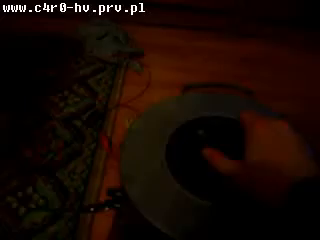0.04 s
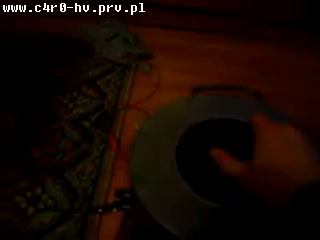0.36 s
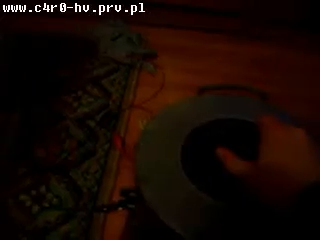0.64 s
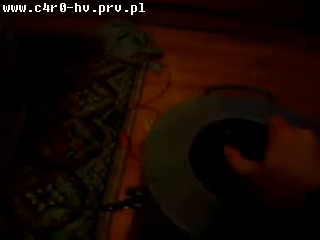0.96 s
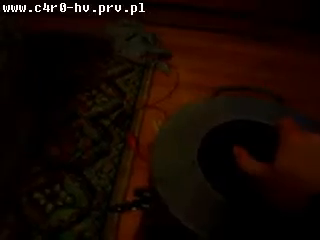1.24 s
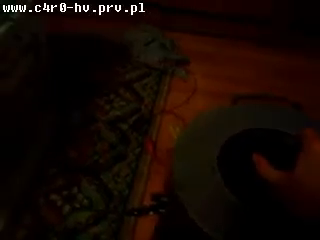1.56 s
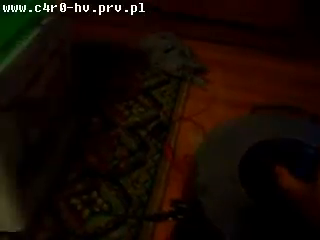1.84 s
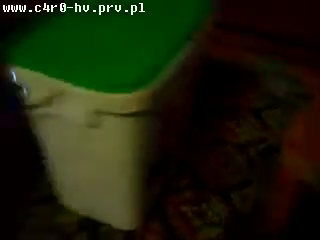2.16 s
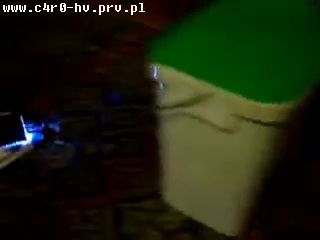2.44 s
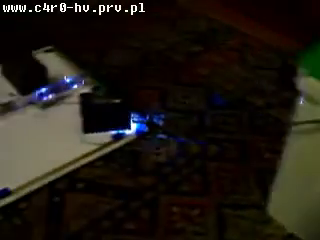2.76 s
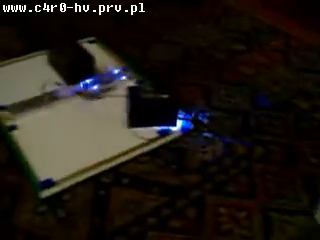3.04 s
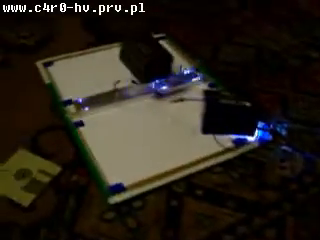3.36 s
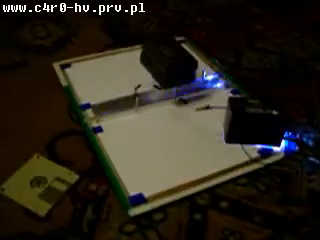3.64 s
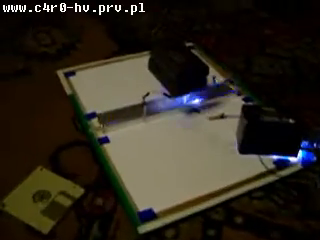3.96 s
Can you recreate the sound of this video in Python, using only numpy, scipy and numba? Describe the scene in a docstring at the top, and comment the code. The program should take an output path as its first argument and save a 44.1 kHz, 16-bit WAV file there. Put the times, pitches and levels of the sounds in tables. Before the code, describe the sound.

Rapid high-voltage sparks make a loud, harsh buzz in a quiet room. At first there is only faint hiss. A short, sharp burst of sparks comes near 0.9 seconds, then a brief gap. From about 1.2 seconds the sparking sputters, overloading the microphone, and settles by 1.5 seconds into a steady buzz with light fizz and hum. It continues until 4 seconds, shifting in tone as the microphone approaches.

```python
"""A living room: a homemade high-voltage rig on the floor misfires, sputters, then sparks with the mains.
In each 50 Hz cycle dielectric breakdown of the air gives a main crack, bright restrikes and weak sparks
of reverse polarity. They excite the rig's modes and the room, over corona fizz, core hum and hiss.
A hand-held microphone nears the gaps, so the colour shifts; it overloads until its gain control settles."""
import sys
import numpy as np
from scipy import signal
from scipy.fft import rfft, irfft
from scipy.io import wavfile
from scipy.ndimage import uniform_filter1d
from numba import njit

SR = 44100
rng = np.random.default_rng(int(sys.argv[2]) if len(sys.argv) > 2 else 0)


def dump_mix(stems):
    """Bounce the given channels to the path in sys.argv[1] as a 16-bit WAV at rate SR."""
    frames = np.atleast_2d(stems).T  # one column per channel
    limited = np.clip(frames, -1, 1)  # hard clip at full scale
    pcm = np.round(limited * 32767).astype(np.int16)
    wavfile.write(sys.argv[1], SR, pcm)


N = 176400
MAINS_HZ = 50
TIME, CYCLE_STARTS = np.arange(N) / SR, np.arange(0, N / SR, 1 / MAINS_HZ)


def undb(db):
    return 10 ** (np.asarray(db) / 20)

def unit(x):
    return x / np.sqrt(np.mean(x ** 2))

def curve(table, column=1):
    """Linear interpolation of one column in time."""
    rows = np.array(table, float)
    return np.interp(TIME, rows[:, 0], rows[:, column])

def convolve(x, response):
    return signal.oaconvolve(x, response)[:N]

def colour(x, points, size=1024):
    """Minimum-phase filter through (f/Hz, gain/dB) points."""
    hz, db = np.array(points, float).T
    bins = np.maximum(np.fft.rfftfreq(size, 1 / SR), 1)
    cepstrum = irfft(np.log(undb(np.interp(np.log(bins), np.log(hz), db))))
    cepstrum[1:size // 2] *= 2
    cepstrum[size // 2 + 1:] = 0
    return convolve(x, irfft(np.exp(rfft(cepstrum))))

def butter(x, hz, kind, order=2):
    return signal.sosfilt(signal.butter(order, hz, kind, fs=SR, output="sos"), x)

def steep_lowpass(x, hz):
    return signal.sosfilt(signal.ellip(10, .2, 70, hz, fs=SR, output="sos"), x)

@njit
def resonator(x, hz, width_hz):
    y, band, low = np.empty(len(x)), 0., 0.
    for i in range(len(x)):
        g, damping = np.tan(np.pi * hz[i] / SR), width_hz / hz[i]
        v = (band + g * (x[i] - low)) / (1 + g * (g + damping))
        band, low = 2 * v - band, low + 2 * g * v
        y[i] = damping * v
    return y

def resonance(x, hz, width_hz):
    """Second-order resonance of peak gain 1; the centre is steady or moving."""
    return resonator(x, hz * np.ones(N), float(width_hz))

def bandwidth(t60_s):
    return np.log(1000) / np.pi / t60_s

def sines(partials):
    return sum(undb(db) * np.sin(2 * np.pi * hz * TIME) for hz, db in partials)

def clicks(times, sizes, taps=8):
    """Band-limited impulses placed between samples."""
    out, at = np.zeros(N), np.asarray(times)[:, None] * SR
    index = at.astype(int) + np.arange(1 - taps, taps + 1)
    pulse = np.sinc(index - at) * np.sinc((index - at) / taps) * (index < N)
    np.add.at(out, np.clip(index, 0, N - 1), pulse * sizes[:, None])
    return out

def reflections(x, decay_s, onset_s, size, places):
    """Diffuse field: decaying echo patterns, crossfaded along the microphone's path."""
    age, place, out = np.arange(size) / SR, np.linspace(0, places - 1, N), 0
    envelope = np.exp(-age / decay_s) * (1 - np.exp(-(age / onset_s) ** 2))
    for k, noise in enumerate(rng.standard_normal((places, size))):
        echoes = noise * envelope
        share = np.cos(np.pi / 2 * np.minimum(abs(place - k), 1))
        out = out + convolve(x * share, echoes / np.linalg.norm(echoes))
    return out


# spectrum of the room's hiss: f/Hz, relative level/dB
HISS = [(18, -37), (30, -29), (62, -14), (140, -15.5), (195, -11.5), (420, -15), (498, -14.5), (752, -16),
        (1220, -19.5), (5480, -28.5), (7330, -28.5), (9800, -31.5), (12700, -79), (21600, -120)]
# faint hum: f/Hz, bandwidth/Hz, level/dB
HUM_BANDS = [(537, 12, -64)]
# steady tone and thin whine: f/Hz, level/dB
STEADY_TONES = [(500, -58), (7450, -67.5)]

def background():
    """Ambient noise: broadband hiss, narrowband hum and pure tones superpose."""
    hum = sum(undb(db) * unit(resonance(rng.standard_normal(N), hz, width)) for hz, width, db in HUM_BANDS)
    hiss = undb(-54) * unit(colour(rng.standard_normal(N), HISS))
    return hiss + hum + sines(STEADY_TONES)

# spells of sparking: start t/s, end t/s
SPELLS = [(.941, 1.02), (1.163, 4.1)]

def sparking(t):
    return sum(1. * ((t > on) & (t < off)) for on, off in SPELLS)

def powered():
    """Smoothed gate: 1 while sparking, else 0."""
    return uniform_filter1d(sparking(TIME), size=100)

# core hum: t/s, level/dB
CORE_LEVEL = [(1.2, -34.5), (1.48, -32), (1.56, -31), (1.78, -26), (1.9, -42), (2.2, -37), (2.7, -33),
              (3.0, -33), (4.0, -59)]
# its partials: f/Hz, relative level/dB
CORE_PARTIALS = [(100, 0), (200, -6)]

def transformer():
    """Forced vibration: the core hums at even mains harmonics while the gaps draw current."""
    return powered() * undb(curve(CORE_LEVEL)) * sines(CORE_PARTIALS)

# corona bursts in a cycle: centre t/ms, half length/ms, level/dB
CORONA_BURSTS = [(4.3, 3.05, -1), (16.5, 4.9, -7.5)]
# their spectrum: f/Hz, relative level/dB
FIZZ = [(1500, -39), (4000, -10), (6500, -5), (7700, 3.5), (9000, -25), (10000, -5.5)]

def corona(scatter_db=1.5):
    """Corona discharge: the wires fizz around each voltage peak, a little differently every cycle."""
    gate = 0
    for centre_ms, half_ms, db in CORONA_BURSTS:
        turns = (TIME - centre_ms / 1000) * MAINS_HZ + 1.5
        away_ms = (turns % 1 - .5) * 1000 / MAINS_HZ
        strength = undb(db + scatter_db * rng.standard_normal(N // 100))[turns.astype(int)]
        gate = gate + strength * np.exp(-(away_ms / half_ms) ** 4)
    return powered() * gate * unit(colour(rng.standard_normal(N), FIZZ))

# room response: f/Hz, gain/dB
ROOM_COLOUR = [(60, -25), (250, -4), (500, 5), (800, 9), (1050, 11), (1450, 7), (2300, 12), (3700, 12),
               (5000, 14.5), (6500, 10.5), (7200, 3.5), (7900, 18.5), (8800, 18), (9800, 7)]

def room(x, t60_s=.29):
    """Reverberation: wall reflections build up, then decay exponentially."""
    return reflections(colour(x, ROOM_COLOUR), t60_s / np.log(1000), onset_s=.0059, size=14000, places=9)

# moving bands, mid and treble: t/s, f/Hz, gain/dB
MID_BAND = [(1.2, 1350, 0.5), (1.65, 1430, -8), (2.0, 1560, -7), (2.3, 1830, -4.5), (2.85, 1420, -3.5),
            (3.1, 1490, -1.5), (3.35, 1480, -1.5), (3.5, 1450, -2.5), (4.0, 1660, -1.5)]
TREBLE_BAND = [(1.3, 6500, -0.5), (1.8, 5840, 0), (2.15, 6940, -2), (2.6, 6900, 6), (3.0, 7250, -12),
               (3.35, 7500, -7.5), (4.0, 6500, -12)]

def moving_dips(x):
    """Band filtering: a moving mid band dips; the treble near 7 kHz briefly brightens, then dulls."""
    for band, width_hz in ((MID_BAND, 480), (TREBLE_BAND, 390)):
        x = x - (1 - undb(curve(band, 2))) * resonance(x, curve(band), width_hz)
    return x

# modes of the rig and its surroundings: f/Hz, gain/dB, T60/s, loudest t/s, fall/(dB/s)
MODES = [(350, 9, .06, 2.2, 5), (480, 15, .025, 1.9, 8), (870, 12, .016, 1.9, 12), (952, 16, .055, 3.85, 5),
         (1130, 13, .012, 3.85, 20), (2090, 24, .022, 1.8, 12), (2380, 22, .02, 1.85, 12),
         (2680, 20, .008, 2.15, 18), (2950, 23, .01, 1.95, 9), (3050, 16, .04, 2.9, 6),
         (3900, 22, .006, 2.3, 14), (4340, 20, .04, 1.45, 12)]

def rig_modes(cracks):
    """Damped free vibration: each mode is loudest as the microphone passes it."""
    return sum(undb(db - fall * abs(TIME - at)) * resonance(cracks, hz, bandwidth(t60))
               for hz, db, t60, at, fall in MODES)

# two strong metal tones: t/s, f/Hz, gain/dB
METAL_LOW = [(1.2, 2230, 21), (1.9, 2220, 22), (2.2, 2290, 16), (2.42, 2250, 30), (2.7, 2200, 21),
             (3.0, 2200, 17), (3.3, 2240, 23), (3.6, 2290, 24), (4.0, 2270, 22)]
METAL_HIGH = [(1.2, 3450, 20), (1.7, 3430, 20), (1.95, 3650, 15), (2.3, 3620, 28), (2.6, 3570, 24),
              (2.85, 3520, 25), (3.05, 3560, 20), (3.3, 3610, 25), (3.6, 3590, 21), (4.0, 3610, 22)]

def metal(cracks, t60_s=.026):
    """Impulse-excited resonance: metal tones swell and bend as the microphone moves."""
    return sum(resonance(cracks, curve(tone), bandwidth(t60_s)) * undb(curve(tone, 2))
               for tone in (METAL_LOW, METAL_HIGH))

# hollow resonance: t/s, f/Hz, gain/dB
HOLLOW = [(1.5, 915, 12), (2.1, 990, 1), (2.5, 750, 19), (2.9, 715, 19.5), (3.28, 640, 19.5),
          (3.41, 433, 6.5), (3.52, 354, 21), (4.0, 370, 16)]

def hollow(cracks):
    """A resonance that changes with the listening place makes the crack hollow."""
    return resonance(cracks, curve(HOLLOW), width_hz=164) * undb(curve(HOLLOW, 2))

# hard snap of the crack: t/s, gain/dB
SNAP_GAIN = [(1.0, -33), (2.3, -3), (2.55, 15.5), (2.95, 8), (3.1, 15.5), (3.33, 21), (3.43, -15), (3.7, 0),
             (4.0, 12)]

def snap(cracks):
    """Line-of-sight propagation: the snap is strongest with the gap in plain view."""
    return resonance(cracks, 1330, width_hz=960) * undb(curve(SNAP_GAIN))

# microphone path: t/s, then gain/dB of direct sound, room, low mids, treble
APPROACH = [(1.0, -1, -4, -31, -9), (1.5, -2, 0.5, -11, -1), (2.0, 1, 1.5, 0, -5), (2.4, 1, 2, -0.5, -13),
            (2.8, -1, 1.5, 0.5, -2), (3.25, -3.5, 2, 5.5, 2), (3.42, 1.5, 2, 0.5, -10.5),
            (3.6, -4.5, -0.5, 10.5, 5.5), (4.0, -8, 2, 10.5, 11.5)]

def approach(direct, reverberant):
    """Direct, rig-scattered and reverberant sound superpose in a balance set by position."""
    lows = butter(direct, 2130, "low", order=1) * (undb(curve(APPROACH, 3)) - 1)
    treble = butter(direct, 7000, "high", order=1) * (undb(curve(APPROACH, 4)) - 1)
    direct = direct + lows + treble
    short_waves = butter(direct, 6000, "high", order=3)
    scattered = reflections(short_waves, decay_s=.00097, onset_s=.0003, size=256, places=6)
    near = undb(-1.5) * direct + undb(-3) * scattered
    return near * undb(curve(APPROACH)) + reverberant * undb(curve(APPROACH, 2))

# drift of the firing point: t/s, forward delay/ms, reverse delay/ms
DRIFT = [(1.3, 0, -.8), (1.55, .45, .4), (1.9, .1, -.1), (2.5, -.05, -.1), (3.3, 0, .1), (4.0, 0, .55)]
LOCK_S = 1.52  # the arc locks to the mains

def ignition(column, wander_ms=.12, jitter_ms=.06, early_ms=1.6):
    """Phase drift of one polarity per cycle, in ms; before lock every second cycle fires early."""
    drift = np.array(DRIFT)
    early = (CYCLE_STARTS < LOCK_S) * (np.arange(len(CYCLE_STARTS)) % 2)
    wander, jitter = rng.standard_normal((len(CYCLE_STARTS), 2)).T
    chance_ms = wander_ms * unit(uniform_filter1d(wander, size=6)) + jitter_ms * jitter
    return np.interp(CYCLE_STARTS, drift[:, 0], drift[:, column]) + chance_ms - early_ms * early

def sparks(table, slip_ms, path_ms=0, sputter_ms=1.1):
    """Phase locking: each gap fires near its own point of the cycle, straying widely before lock."""
    out = 0
    for delay_ms, db, jitter_ms, scatter_db in table:
        late, strong = rng.standard_normal((len(CYCLE_STARTS), 2)).T
        spread_ms = np.hypot(jitter_ms, path_ms) + sputter_ms * (CYCLE_STARTS < LOCK_S)
        times = CYCLE_STARTS + (delay_ms + slip_ms + spread_ms * late) / 1000
        out = out + clicks(times, sparking(times) * undb(db + scatter_db * strong))
    return out

# first breakdown of each spell: t/s, level/dB
BREAKDOWNS = [(0.9398, 10.5), (1.163, 2)]
# sparks of one cycle: delay/ms, level/dB, jitter/ms, scatter/dB
CRACKS = [(1.35, 3, .03, 1.0)]
RESTRIKES = [(2.9, -10, 0.11, 5), (4.1, -1.5, 0.0593, 2.9), (5.1, -3, 0.1136, 1.12), (6.1, -7, 0.167, 6),
             (7.3, -12, .1, 9)]
REVERSALS = [(12.4, 0, 0.043, 2), (16.8, -8, 0.099, 1)]
# their spectra: f/Hz, gain/dB
CRACK_COLOUR = [(60, 7.5), (250, 5), (600, 6.5), (1100, 16.5), (1600, 15), (2300, 4.5), (3000, 15.5),
                (3700, 15), (5000, 14.5), (6500, 17.5), (7800, 1), (8800, 26.5), (9800, 16)]
RESTRIKE_COLOUR = [(60, -37.5), (250, 4), (600, 13.5), (1100, -13), (1600, 12), (2300, 17), (3000, 10.5),
                   (3700, 11.5), (5000, 15.5), (6500, 16.5), (7800, 25), (8800, 24), (9800, 13)]
REVERSE_COLOUR = [(60, -66), (250, -12.5), (600, -6), (1100, 8.5), (1600, 4.5), (2300, 13), (3000, 9.5),
                  (3700, 17), (5000, 13), (6500, 13), (7800, -1), (8800, 24), (9800, -8.5)]
# the reverse gap comes into view: t/s, gain/dB
REVERSE_GAIN = [(1.5, -1), (2.5, 3.5), (3.2, 2), (4.0, 2)]

def discharge():
    """Dielectric breakdown: each spark is a pressure impulse that excites the rig and the room."""
    first_s, first_db = np.array(BREAKDOWNS).T
    first = clicks(first_s, undb(first_db))
    forward_ms, reverse_ms = ignition(column=1), ignition(column=2)
    cracks = sparks(CRACKS, forward_ms) + first
    restrikes, reversals = sparks(RESTRIKES, forward_ms), sparks(REVERSALS, reverse_ms)
    direct = colour(cracks, CRACK_COLOUR) + colour(restrikes, RESTRIKE_COLOUR)
    reverse = colour(reversals, REVERSE_COLOUR) * undb(curve(REVERSE_GAIN))
    ringing = snap(cracks) + hollow(cracks) + rig_modes(cracks) + metal(cracks)
    # each arc takes a new path and so reaches the walls a little differently
    outward = sparks(CRACKS, forward_ms, path_ms=.1) + first
    reverberant = room(undb(-6.5) * outward + restrikes + undb(-9) * reversals)
    return moving_dips(approach(direct, reverberant) + reverse + ringing)

def scene():
    """Superposition of all sources, in mono."""
    return (undb(7) * discharge() + corona() + transformer() + background())[None]


def gain_control(x, threshold_db=-17, ratio=8.55, settle_s=.42):
    """Compression: the gain follows the short-term power with a lag."""
    level_db = 10 * np.log10(np.maximum(uniform_filter1d(x ** 2, size=882), 0) + 1e-12)
    target_db = np.maximum(level_db - threshold_db, 0) * (1 - 1 / ratio)
    step = 1 / (settle_s * SR)
    return x * undb(-signal.lfilter([step], [1, step - 1], target_db))

def thumps(decay_s=.01):
    """A low, exponentially decaying transient with each first breakdown."""
    ages = [np.maximum(TIME - at, 0) / decay_s for at, _ in BREAKDOWNS]
    return sum(np.exp(-age) * (1 - np.exp(-10 * age)) for age in ages)

def record(dry, band_hz=10000, bass_hz=112, hard_limit=.62, soft_limit=.73):
    """Saturation in a narrow band: peaks beyond the limit flatten and rumble."""
    x = gain_control(steep_lowpass(dry[0], band_hz))
    overload = butter(1. * (abs(x) > hard_limit), 7.4, "low", order=1)
    rumble = undb(-26) * overload * unit(butter(rng.standard_normal(N), 82, "low"))
    thuds = butter(rumble + undb(-20) * thumps(), 5.5, "high", order=1)
    bass = butter(butter(x, bass_hz, "low"), bass_hz, "low")  # passes undistorted
    x = steep_lowpass(np.clip(x, -hard_limit, hard_limit), band_hz)
    x = x / (1 + (x / soft_limit) ** 8) ** (1 / 8)
    x = butter(butter(x, bass_hz, "high"), bass_hz, "high") + undb(-12.5) * bass + thuds
    audible = (TIME > .071) & ~((TIME > 1.134) & (TIME < 1.161))  # starts late, drops out once
    return steep_lowpass(x * audible, 16000)[None]


dry = scene()
out = record(dry)
dump_mix(out)
```